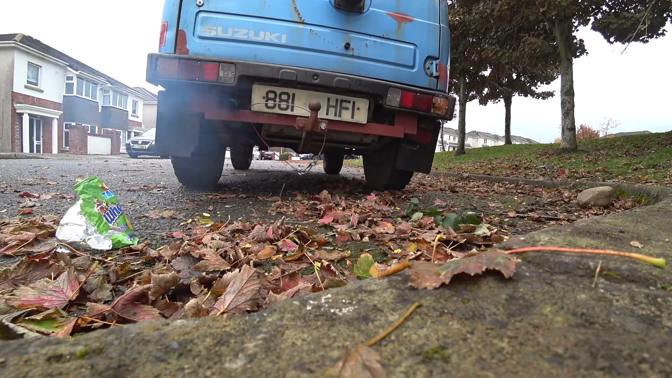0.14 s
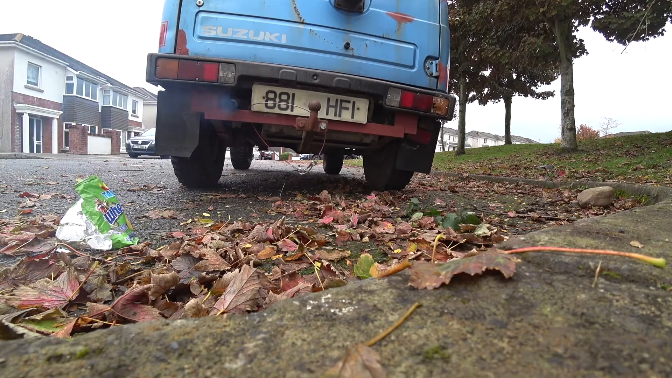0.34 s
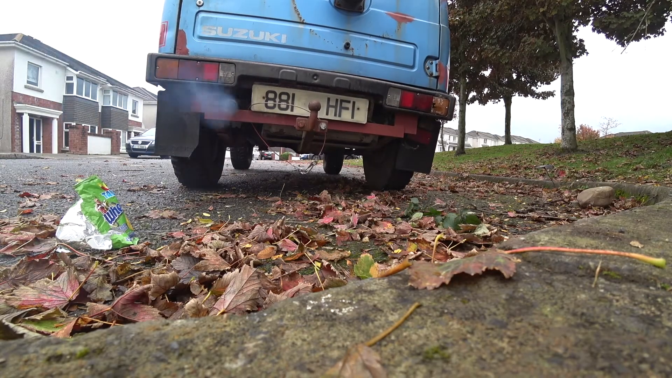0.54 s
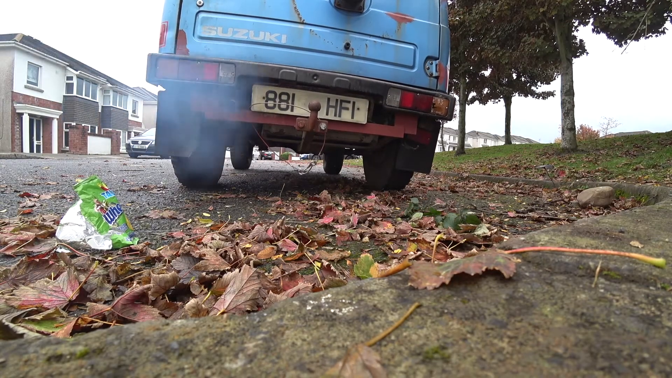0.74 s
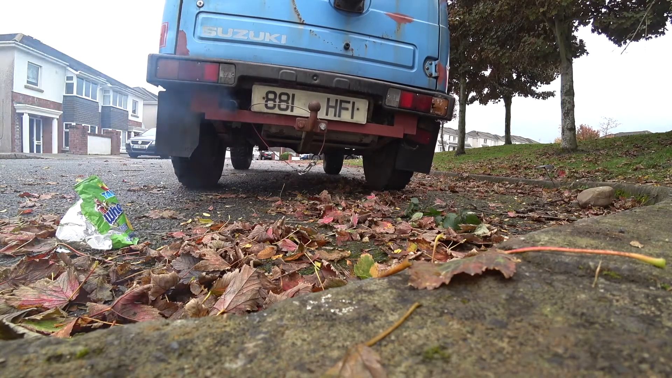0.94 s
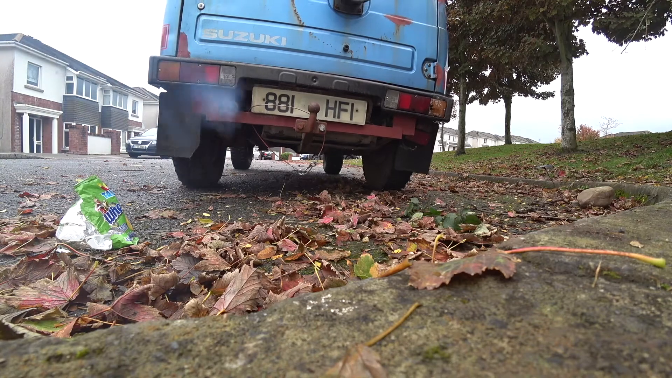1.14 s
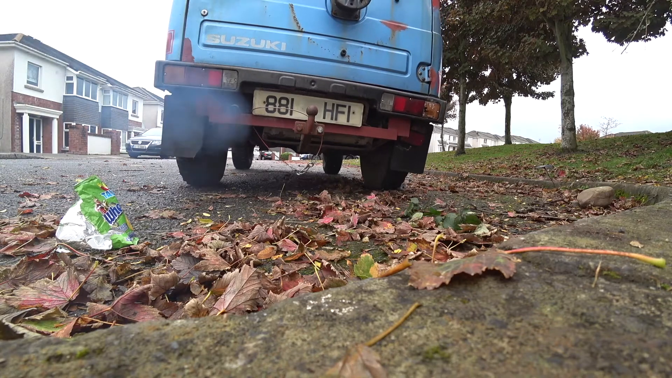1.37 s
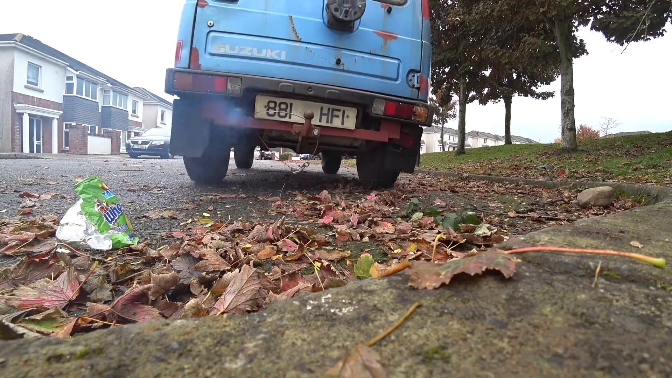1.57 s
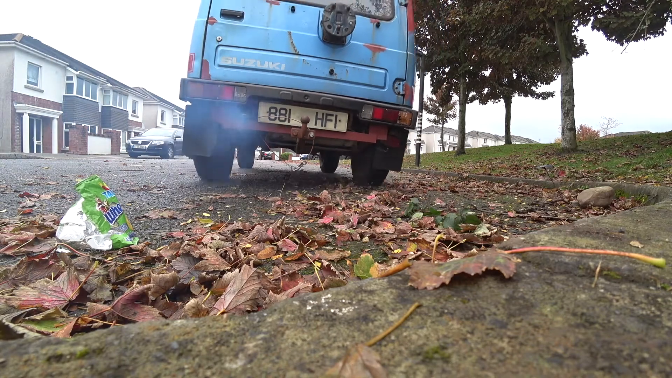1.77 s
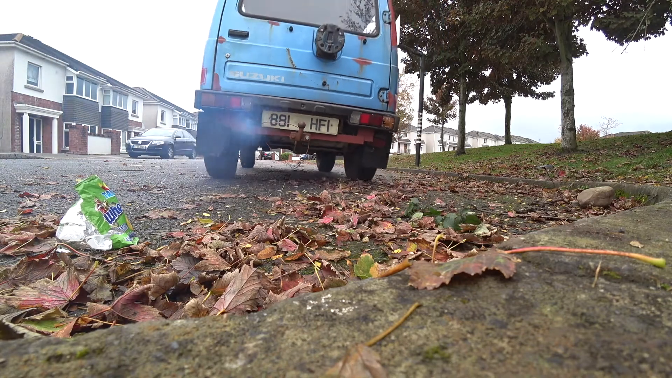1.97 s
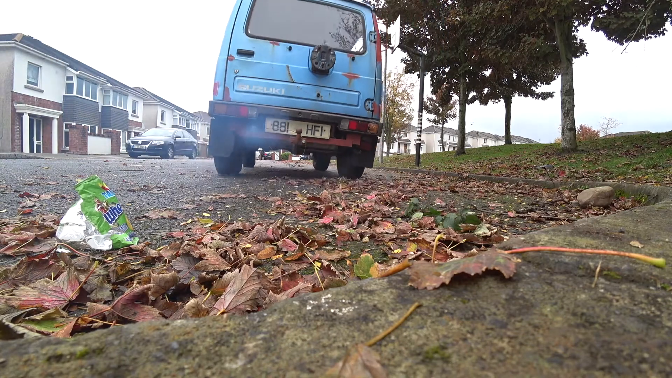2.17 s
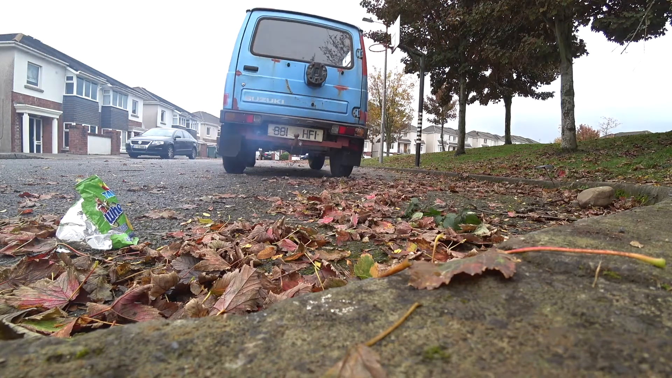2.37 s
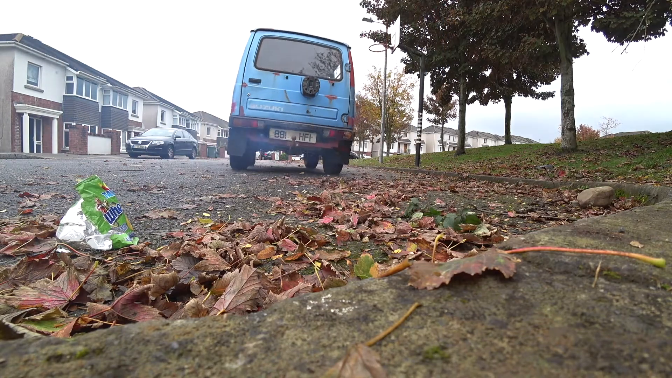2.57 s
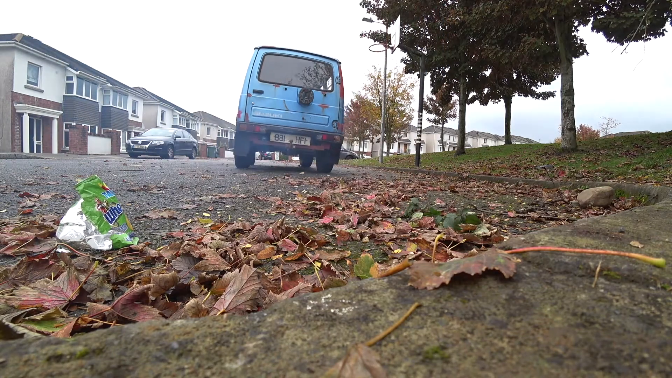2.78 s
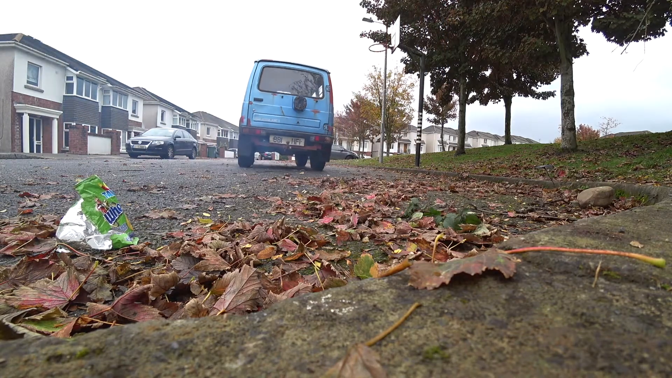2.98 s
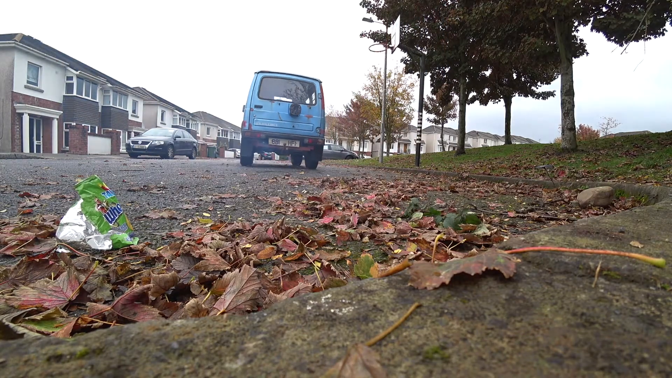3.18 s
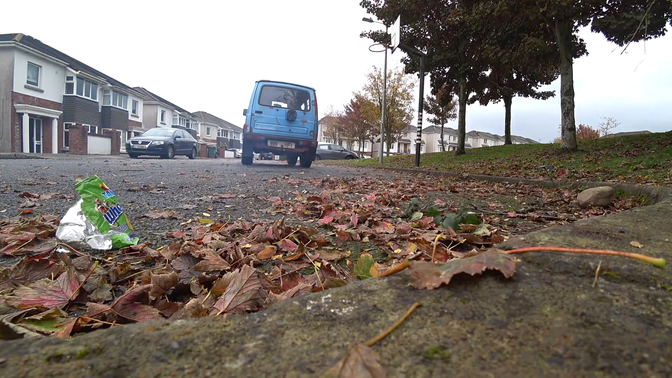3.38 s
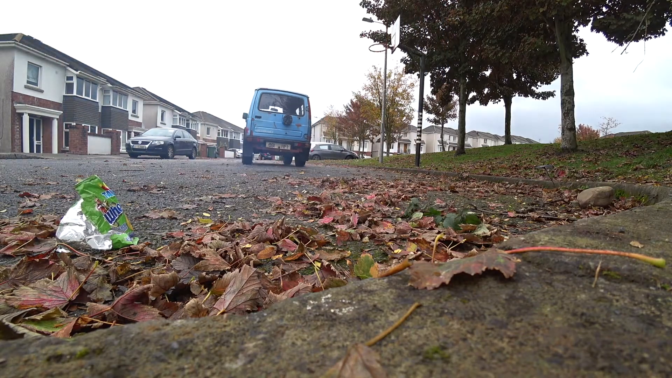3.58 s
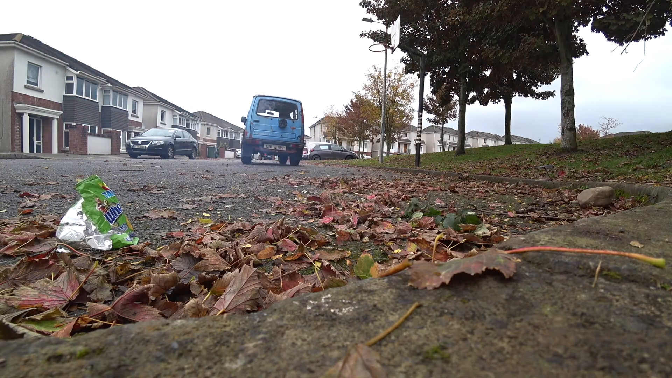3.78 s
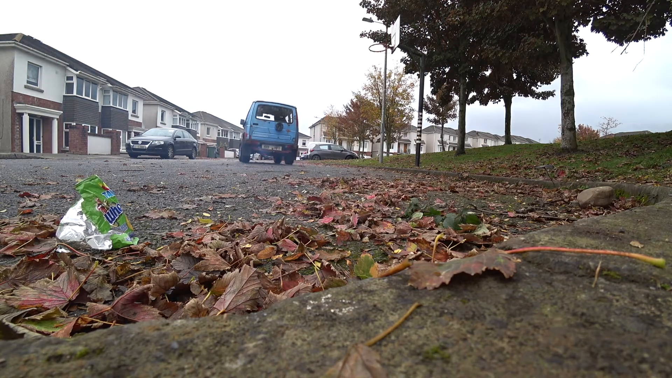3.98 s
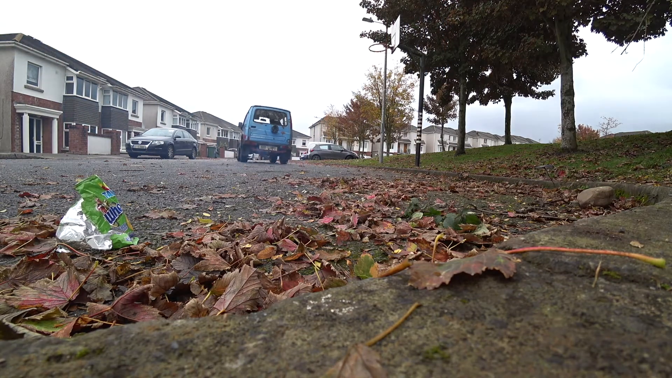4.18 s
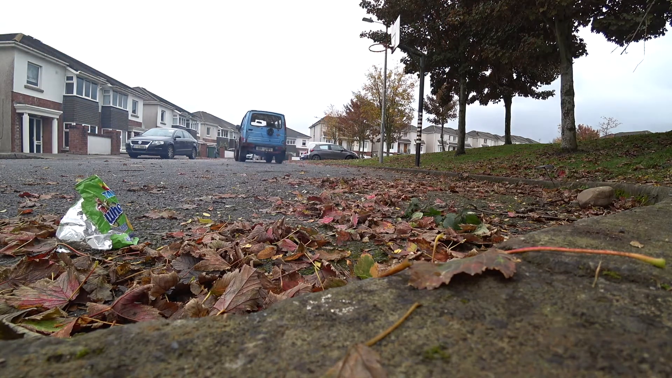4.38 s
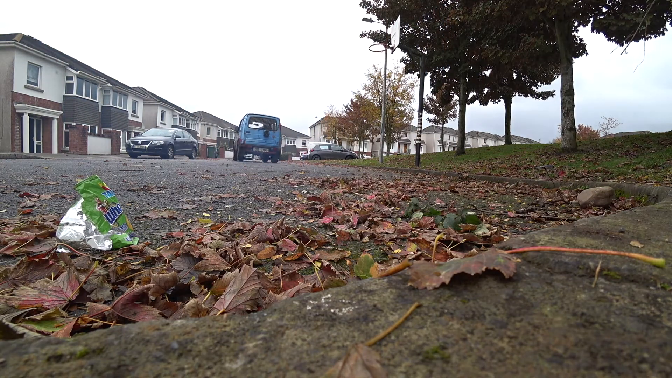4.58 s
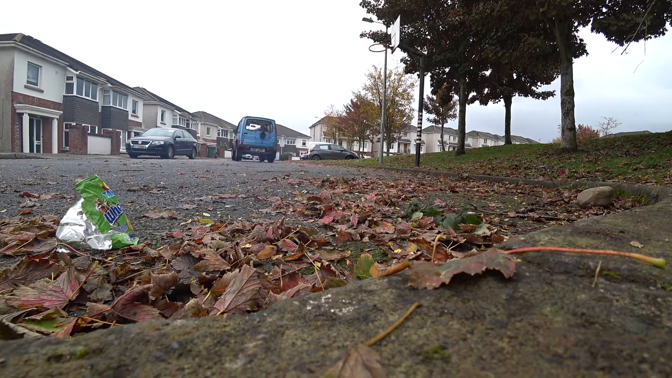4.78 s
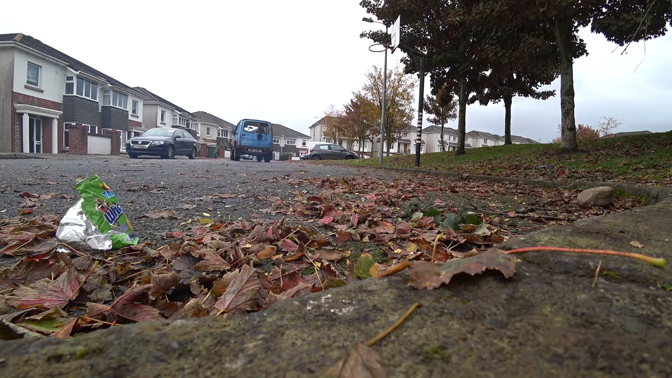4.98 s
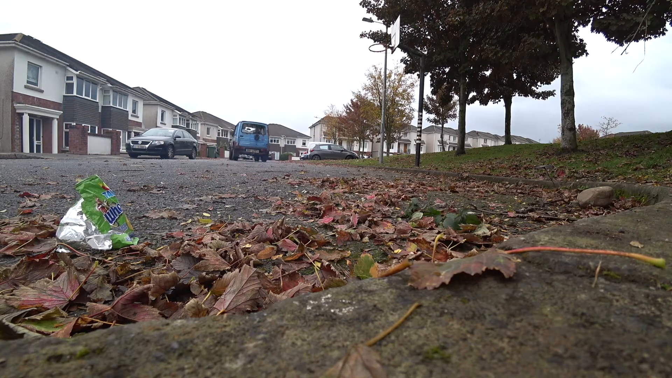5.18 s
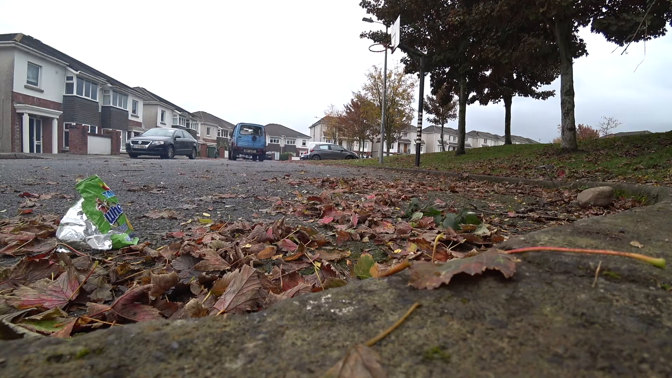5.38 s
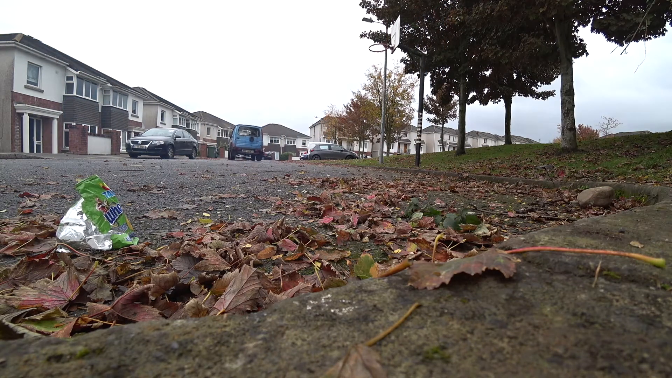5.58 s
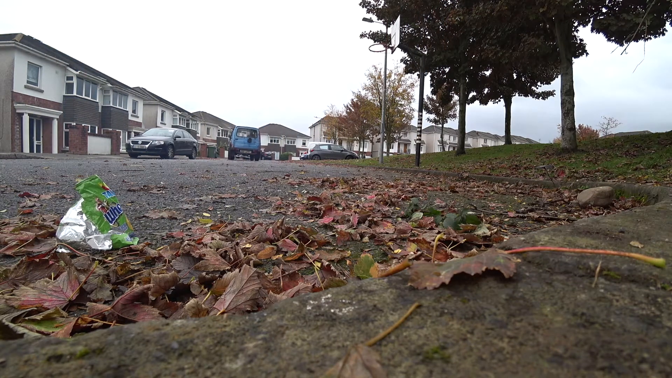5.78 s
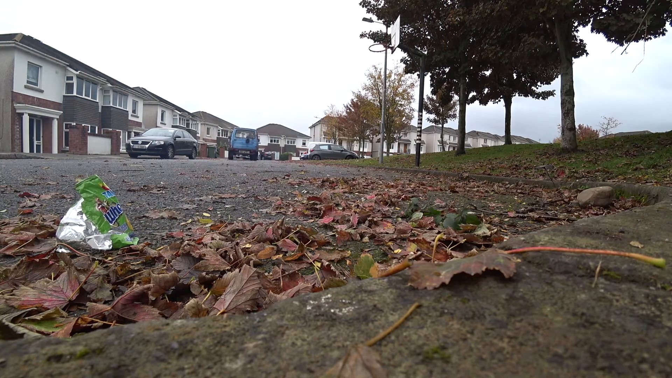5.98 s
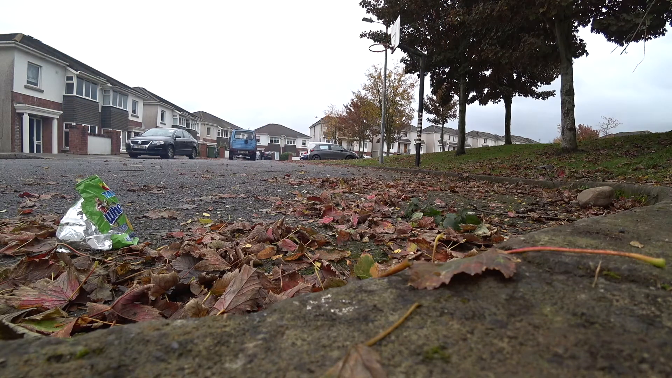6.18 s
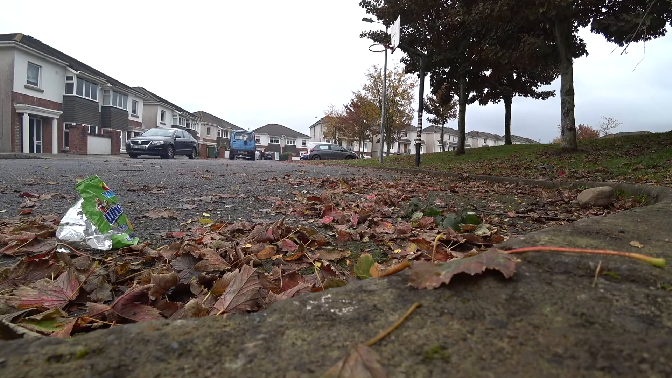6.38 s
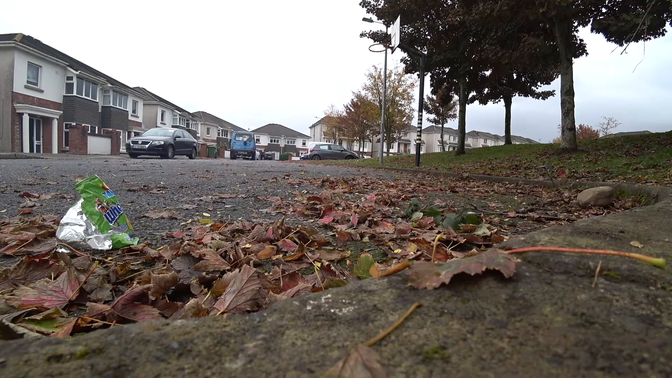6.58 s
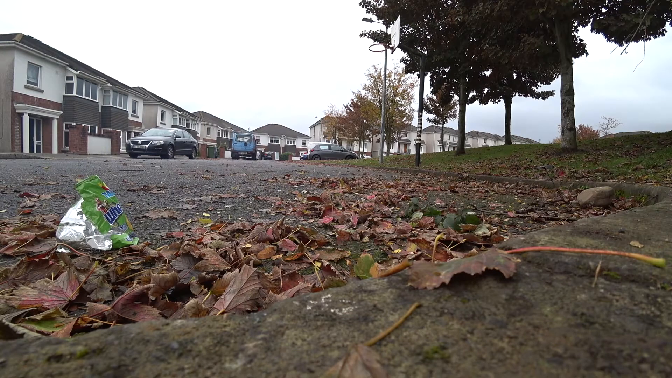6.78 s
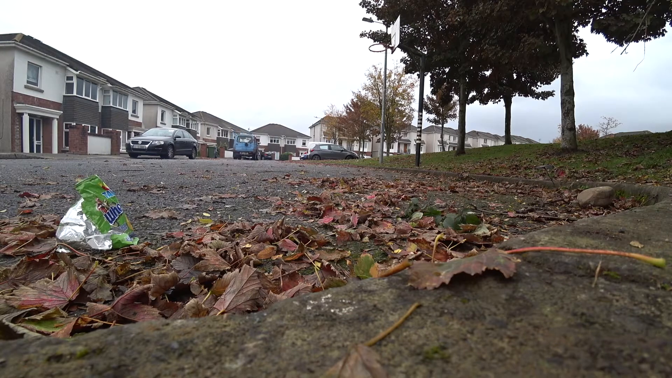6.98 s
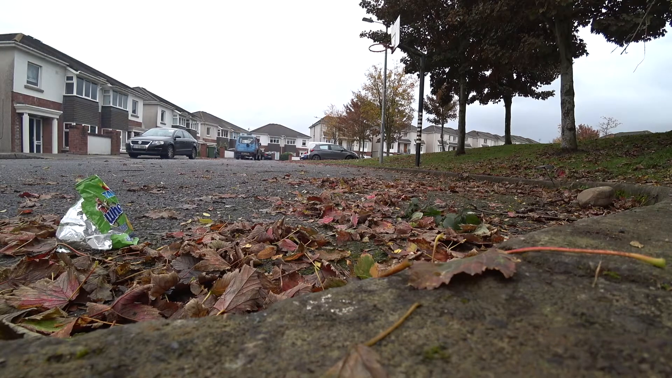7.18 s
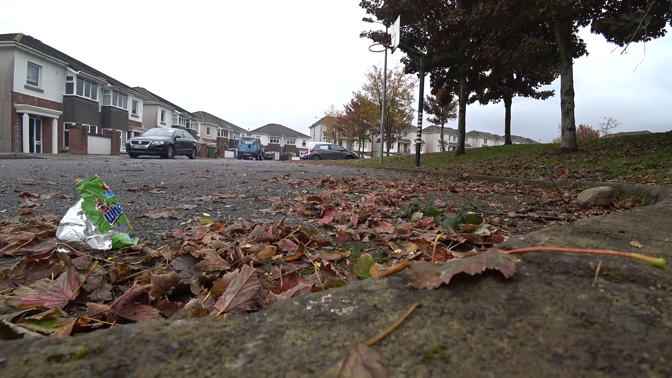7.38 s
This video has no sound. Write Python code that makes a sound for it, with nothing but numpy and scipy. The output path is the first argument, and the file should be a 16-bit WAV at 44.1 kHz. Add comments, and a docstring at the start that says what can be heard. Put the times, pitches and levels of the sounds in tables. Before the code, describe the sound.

A fixed microphone low at the kerb hears a rough little engine revved twice, its tailpipe booming and barking slightly to the left. The car moves off, leaves rustling and snapping under its tyres. The engine sags, pulls harder in first gear, eases off, then takes up a softer, lower hum in the distance. Faint bassy street noise and short house echoes surround it.

```python
"""A small old four-cylinder 4x4 blips its throttle twice, pulls away from the kerb and changes up once.
The tailpipe booms in low multiples of the firing rate, barks in higher ones and rasps in puffs of noise.
A loose exhaust shield buzzes under load, the block hums, and the valve gear ticks and hisses in pulsed noise.
Noise bursts crack dry leaves and grit under the tyres, leaves rustle, house fronts echo the exhaust,
and a faint steady noise is the street."""
import sys
import numpy as np
from scipy import signal
from scipy.fft import rfft, irfft, next_fast_len
from scipy.io import wavfile

SR = 44100
rng = np.random.default_rng(int(sys.argv[2]) if len(sys.argv) > 2 else 0)


def to_wav(sig):
    """Store sig (one row per channel, or 1-D mono) as 16-bit WAV at the path in sys.argv[1].

    Samples outside -1..1 are clipped; the rate is SR.
    """
    pcm = np.clip(np.atleast_2d(sig), -1, 1) * 32767
    pcm = np.round(pcm).astype(np.int16)
    wavfile.write(sys.argv[1], SR, pcm.T)  # frames by channels


N = 328104

# colour of the street: pitch_hz, relative level_db
STREET_COLOUR = [(20, -8), (45, -1), (70, 6.5), (120, -5.5), (155, 5.5), (200, -5), (290, -5), (400, -11),
                 (900, -36), (2000, -34.5)]
# how alike left and right are in the noises: pitch_hz, likeness 0-1
LIKENESS = [(60, 1), (180, 1), (350, 0.9), (700, 0.89), (1300, 0.57), (2000, 0.75), (2800, 0.59),
            (3600, 0.76), (7000, 0.8), (10000, 0.73)]
# how far the sound leans to the left: start_s, lean (1 = the port tables as they stand)
LEAN = [(0, 1.1), (1.8, 0.97), (2.3, 0.6), (3.2, 0.25), (3.6, 1.26), (4.4, 0.48), (5.6, 0.19), (7.44, 0.24)]
# left ahead of right at a lean of 1: pitch_hz, lead_radians
PORT_PHASE = [(40, 0.28), (90, 0.67), (150, 0.94), (300, 1.24), (900, 0.78), (1500, 0.25), (2300, 0.46),
              (3200, 0.09), (10000, 0.096)]
# left louder than right at a lean of 1: pitch_hz, difference_db
PORT_BALANCE = [(60, 1), (110, 1), (190, 2.5), (340, 3), (620, 0.5), (1100, 4), (1970, 2), (3530, 1),
                (6320, 0.5), (11300, 0)]
CUTOFF_HZ = 11100

# leaves and grit cracking under the tyres: start_s, relative peak level_db, pitch_hz
CRACKS = [(2.053, -24, 6500), (2.114, -28, 2013), (2.12, -22.5, 4500), (2.182, -23, 4330),
          (2.231, -25, 4100), (2.27, -25, 2130), (2.297, -23.5, 4540), (2.33, -27, 7460),
          (2.458, -31, 2310), (2.477, -23, 1920), (2.483, -27, 2900), (2.484, -27, 8000),
          (2.586, -30, 7100), (2.654, -27, 4230)]
# dry leaves rustling under the tyres and in the car's wake: start_s, level_db before flutter
RUSTLE_LEVEL = [(0, -75), (1.9, -53), (2.35, -44), (2.6, -48), (2.9, -56.5), (4.0, -53), (4.4, -78),
                (7.44, -91)]
# colour of the rustle: pitch_hz, relative level_db
RUSTLE_COLOUR = [(2000, -15), (7000, -5), (9000, -3), (11000, -2)]

# stabs of the pedal while standing: pressed_s, released_s, gain in firings_per_s
BLIPS = [(0.0, 0.108, 14), (.625, .755, 15)]
BLIP_ATTACK_S, BLIP_RELEASE_S, SPIN_DOWN_S = 0.029, 0.11, 0.025
# as the pedal snaps up after a blip, the boom swells once, deeper
SWELL_DELAY_S, SWELL_WIDTH_S = 0.048, 0.075
# engine speed without the blips: start_s, rate in firings_per_s
SPEED = [(0.0, 72.5), (0.22, 79.0), (0.45, 73.9), (0.6, 70.6), (0.85, 81.4), (0.96, 75.8), (1.08, 79.2),
         (1.27, 74.0), (1.58, 78.4), (1.79, 75.6), (2.05, 63.8), (2.32, 60.0), (2.54, 58.8), (2.77, 55.4),
         (3.06, 61.5), (3.35, 64.0), (3.58, 74.4), (3.9, 79.6), (4.11, 85.5), (4.18, 86.5), (4.26, 80.3),
         (4.56, 76.1), (5.13, 65.2), (5.44, 44.4), (5.85, 51.0), (6.34, 54.0), (6.89, 54.0), (7.44, 59.6)]
# throttle without the blips; the pedal takes up the clutch, eases, pulls in first gear,
# lifts for the change and pulls gently in second: start_s, throttle 0-1
THROTTLE = [(0, 0.81), (.5, 0.79), (.95, 0.79), (1.5, 0.96), (1.9, 0.75), (2.5, 0.68), (2.75, 0.45),
            (3.25, 0.59), (3.5, 0.9), (4.04, 0.83), (4.22, 0.44), (4.8, .25), (5.52, 0.06), (5.75, 0.38),
            (7.05, .39), (7.44, 0.62)]
# the car draws away: start_s, share of the distant colour 0-1
FAR = [(0, .1), (1.7, 0.062), (2.48, 0.48), (2.8, 0.83), (4.2, 1), (6.9, 0.8), (7.44, 0.6)]
# sharply pulsed on an open throttle, only a rush on the overrun: start_s, pulsed share of the exhaust 0-1
PULSED = [(0, .48), (1.2, .52), (1.42, .85), (1.8, .8), (2.0, .42), (3.3, .5), (3.5, .85), (4.08, .85),
          (4.2, .12), (5.6, .12), (5.9, .66), (7.44, .62)]

# the engine block, in the open once the car has moved off: start_s, level_db
BLOCK_LEVEL = [(0, -51), (1.6, -53), (1.9, -40.5), (2.5, -40), (3.2, -48.5), (4.2, -55), (5.5, -58.5),
               (6.2, -45), (7.44, -74)]
# modes of the block: pitch_hz, relative level_db, ring_s to fall 60 dB
BLOCK_MODES = [(653, -16.5, 0.076), (861, -5.5, 0.041), (1236, -2.5, 0.035)]
# modes of the loose exhaust shield: pitch_hz, relative level_db, ring_s to fall 60 dB
SHIELD_MODES = [(1900, -12, .012), (2123, -3, 0.025), (2287, 0, 0.015), (2520, -30, 0.021),
                (3400, -1.5, 0.0052), (4260, -4.5, 0.023)]
# colours of the valve gear, near and far: pitch_hz, relative level_db
CLATTER_NEAR = [(620, -5), (1050, -2), (1140, -0.5), (1400, -6), (1650, -3.5), (1930, -6), (2060, -5.5),
                (2220, -8), (2730, -10), (3250, -4.5), (3780, -6), (4170, -4), (5170, -11.5), (5500, -16),
                (7150, -31), (12100, -120)]
CLATTER_FAR = [(620, -36), (1050, -4), (1240, -7.5), (1390, -4.5), (2220, -11), (2770, -16.5),
               (4110, -11.5), (5500, -24), (7150, -22), (12100, -120)]
HISS_NEAR = [(3120, -14), (5300, -3), (6250, 3.5), (7420, 3), (8560, -6), (10200, -3.5), (11000, -9.5),
             (14300, -41), (22000, -120)]
HISS_FAR = [(3120, -2.5), (5300, -1.5), (7080, -1.5), (8610, -9.5), (10500, -11.5), (11000, -16.5),
            (14300, -42), (22000, -120)]

# underbody panels: pitch_hz, width_hz, relative level_db
PANELS = [(436, 8.6, -0.5), (605, 16, -1.5), (695, 29, -5.5), (880, 66, -1), (1154, 40, 2)]
# colour of the rushing gas: pitch_hz, relative level_db
RASP_COLOUR = [(25, -40), (60, 1), (115, -2.5), (160, 10), (215, -5), (285, 3.5), (350, 0), (450, -2.5),
               (600, -4.5), (760, -5.5), (880, -9.5), (1050, -10), (1300, -21), (1800, -43)]
# response of the pipe to the higher multiples: pitch_hz, relative level_db
PIPE = [(300, -20), (365, 2.5), (450, 3.5), (530, 7), (620, 1.5), (780, 0.5), (900, -5), (1050, -10.5),
        (1250, -8), (1600, -20.5), (2200, -13)]
# exhaust resonances through which the boom's partials glide: pitch_hz, relative level_db
SILENCER = [(45, -52), (53, -50), (60, -24), (72, -17.5), (80, -17), (92, -20), (112, -21), (135, -25),
            (148, -17.5), (160, -15.5), (175, -18.5), (195, -23.5), (220, -38.5), (240, -29), (270, -22),
            (298, -29), (318, -47.5), (340, -34.5), (365, -33), (410, -35.5), (445, -36)]
# the first five multiples of the firing rate: relative level_db at full throttle,
# drop_db with the throttle shut, change_db far away, change_db in the swell
PARTIALS = [(1.14, 3.5, 0.6, 5), (0, 11, -2.5, -3), (-3, 13, 1.35, -3.5), (3, 23.5, -5.5, -7),
            (0, 33, 4.5, 3)]
# overall course of the boom: start_s, relative level_db
BOOM_LEVEL = [(0, 0), (.55, -1.6), (1.1, -0.5), (1.8, 1), (2.45, 1), (2.6, 2), (2.78, 6.5), (2.97, -2),
              (3.35, -1.3), (3.5, 0), (4.02, 2), (4.15, -4), (5.07, -5), (5.16, -9), (5.35, -7),
              (5.58, -0.5), (5.85, 4.5), (6.8, 2.5), (7.44, -1.8)]

# levels at full throttle, drops with the throttle shut, and losses far away (dB)
BARK_DB, RASP_DB, EXHAUST_DROP_DB = -31.04, -23, 17.5
CLATTER_DB, CLATTER_DROP_DB = -36, 14
HISS_DB, HISS_DROP_DB, HISS_FAR_LOSS_DB = -38, 11.5, 4.5
# the steep drop lets the shield buzz only when the engine pulls hard
BUZZ_DB, BUZZ_DROP_DB, BUZZ_FAR_LOSS_DB = -24.5, 79, 5


def from_db(db):
    """Decibels to gain."""
    return 10 ** (np.asarray(db) / 20)


def rms_one(x):
    """Scale to rms 1."""
    return x / np.sqrt(np.mean(x ** 2) + 1e-20)


def in_time(curve):
    """Read a two-column curve at every sample."""
    s, value = np.transpose(curve)
    return np.interp(np.arange(N) / SR, s, value)


def at_hz(points, hz):
    """Read a spectrum on a log-frequency axis."""
    f, value = np.transpose(points)
    return np.interp(np.log(hz + 1e-3), np.log(f + 1e-3), value)


def filtered(x, response):
    """Apply a response, given as a function of Hz."""
    size = next_fast_len(N + 8192)
    hz = np.arange(size // 2 + 1) * SR / size
    return irfft(rfft(x, size) * response(hz), size)[..., :N]


def bandpassed(x, order, low_hz, high_hz):
    """Keep a band of pitches."""
    sos = signal.butter(order, [low_hz, high_hz], "band", fs=SR, output="sos")
    return signal.sosfilt(sos, x)


def drift(rate_hz):
    """Slow random wander of spread 1, made at a fortieth of the sample rate."""
    r = np.exp(-80 * np.pi * rate_hz / SR)
    slow = signal.lfilter([1], [1, -2 * r, r * r], rng.standard_normal(N // 40 + 2002))
    slow = rms_one(slow[2000:])  # past the settling
    return np.interp(np.arange(N) / 40, np.arange(len(slow)), slow)


def noise(spectrum):
    """Stereo noise of a given colour, falling steeply above its last point; its two sides differ by pitch."""
    def colour(hz):
        return from_db(at_hz(spectrum, hz)) / np.maximum(hz / spectrum[-1][0], 1) ** 2

    def alike(hz):
        return np.clip(at_hz(LIKENESS, hz), 0, 1)

    mid = filtered(rng.standard_normal(N), lambda hz: colour(hz) * np.sqrt(1 + alike(hz)))
    side = filtered(rng.standard_normal(N), lambda hz: colour(hz) * np.sqrt(1 - alike(hz)))
    return np.array([mid + side, mid - side]) / mid.std()


def receding_noise(near_colour, far_colour, far):
    """Crossfade from the near colour to the distant one at equal power."""
    return np.sqrt(1 - far) * noise(near_colour) + np.sqrt(far) * noise(far_colour)


def ring(clicks, hz, t60):
    """A unit click sets a decaying sine ringing, of height 1 before decay."""
    r, w = from_db(-60 / (t60 * SR)), 2 * np.pi * hz / SR
    return signal.lfilter([0, np.sin(w)], [1, -2 * r * np.cos(w), r * r], clicks + 1e-18)


def puffs(turns, decay, steady, scatter_db):
    """An envelope of rms 1 that jumps to a new height once a turn and dies away over a share of the turn."""
    height = from_db(scatter_db * rng.standard_normal(4096).clip(-2, 2))
    return rms_one(steady + height[turns.astype(int)] * np.exp(-(turns % 1) / decay))


def street():
    """A faint steady noise, strongest in the bass."""
    return from_db(-35) * noise(STREET_COLOUR)


def house_fronts(x):
    """Six dull echoes a side, each at its own delay."""
    x = bandpassed(x, 1, 250, 2500)
    lags = (rng.uniform(.02, .16, (2, 6)) * SR).astype(int)
    return from_db(-8) * np.array([sum(np.pad(x, (lag, 0))[:N] for lag in side) for side in lags])


def microphone_ports(x):
    """Sound from the left reaches the left port earlier and a little louder."""
    def lead(hz):
        return 1j * np.tan(at_hz(PORT_PHASE, hz) / 2) + np.tanh(at_hz(PORT_BALANCE, hz) * np.log(10) / 40)

    side = in_time(LEAN) * filtered(x.mean(axis=0), lead)
    return x + np.array([side, -side])


def rustle():
    """Leaves brush together as fluttering, treble-heavy noise."""
    return from_db(in_time(RUSTLE_LEVEL) + 2.5 * drift(40)) * noise(RUSTLE_COLOUR)


def cracks():
    """Each leaf or bit of grit snaps as a short noise burst around its own pitch."""
    out, t = np.zeros((2, N)), np.arange(SR // 20) / SR
    for s, db, hz in CRACKS:
        burst = rng.standard_normal(len(t)) + 0.27 * rng.standard_normal((2, len(t)))
        burst = burst * np.exp(-t / 0.003)
        burst = bandpassed(burst, 2, hz / 1.24, min(hz * 1.13, SR / 2.2))
        start = int(s * SR)
        out[:, start:start + len(t)] += from_db(db - 1.5) * burst / abs(burst).max()
    return out


def driver():
    """A blip opens the throttle and the engine races, then spins down; gives firing rate, shut 0-1 and swell."""
    t = np.arange(N) / SR
    firing_hz, shut, swell = in_time(SPEED), 1 - in_time(THROTTLE), 0
    for pressed, released, gain_hz in BLIPS:
        # the pedal is down at "pressed" and fully up at "released"
        pedal = np.clip(np.minimum(1 + (t - pressed) / BLIP_ATTACK_S, (released - t) / BLIP_RELEASE_S), 0, 1)
        spin_up = np.clip((t - pressed) / (released - pressed), 0, 1)
        spin_down = np.exp(-np.maximum(t - released, 0) / SPIN_DOWN_S)
        shut = shut * (1 - pedal) ** 2
        firing_hz = firing_hz + gain_hz * spin_up * spin_down
        swell = swell + np.exp(-((t - released - SWELL_DELAY_S) / SWELL_WIDTH_S) ** 2)
    return firing_hz, shut, swell


def block(firings):
    """Combustion knocks the engine block, which hums in a few modes."""
    knocks = rng.standard_normal(N) * puffs(firings, decay=1.0, steady=0.36, scatter_db=-1.5)
    hum = sum(from_db(db) * ring(knocks, hz, t60) for hz, db, t60 in BLOCK_MODES)
    return from_db(in_time(BLOCK_LEVEL)) * rms_one(hum)


def valve_hiss(firings, shut, far):
    """The valves close between firings, each time with a puff of treble noise."""
    level_db = HISS_DB - HISS_DROP_DB * shut - HISS_FAR_LOSS_DB * far
    closing = puffs(firings + 0.26, decay=0.43, steady=2.5, scatter_db=6.5)
    return from_db(level_db) * receding_noise(HISS_NEAR, HISS_FAR, far) * closing


def valve_clatter(firings, shut, far):
    """The valve gear ticks as noise that jumps at every firing."""
    ticks = puffs(firings, decay=0.35, steady=1.95, scatter_db=5.5)
    clatter = receding_noise(CLATTER_NEAR, CLATTER_FAR, far)
    return from_db(CLATTER_DB - CLATTER_DROP_DB * shut) * clatter * ticks


def shield(firings, shut, far):
    """The loose sheet is knocked hard once per crank turn, softer by the firing between, and chatters each time."""
    chatter_s = 0.0035
    buzz_db = BUZZ_DB - BUZZ_DROP_DB * shut - BUZZ_FAR_LOSS_DB * far
    count = (firings + .7).astype(int)
    knock_db = buzz_db - 2.0 * (count % 2) + rng.standard_normal(N)
    knocks = np.diff(count, prepend=0) * from_db(knock_db)
    contact = signal.lfilter([1], [1, -np.exp(-1 / (chatter_s * SR))], knocks + 1e-18) / np.sqrt(chatter_s * SR)
    chatter = contact * (rng.standard_normal(N) + 0.49 * rng.standard_normal((2, N)))
    push = 0.46 * knocks + chatter
    return sum(from_db(db) * ring(push, hz, t60) for hz, db, t60 in SHIELD_MODES)


def body(x):
    """Panels ring at their own fixed pitches, lifting whatever glides through them."""
    def peaks(hz):
        return 1 + sum(from_db(db) / (1 + 2j * (hz - centre) / width) for centre, width, db in PANELS)

    return rms_one(filtered(x, peaks))


def rasp(firings, shut, pulsed):
    """Gas rushes out as noise, swelling in a puff at every firing."""
    rush = from_db(RASP_DB - EXHAUST_DROP_DB * shut) * np.sqrt(1 - pulsed) * body(noise(RASP_COLOUR))
    return rush * puffs(firings, decay=.55, steady=1.35, scatter_db=3)


def bark(firings, firing_hz, shut, pulsed):
    """Higher multiples glide through the pipe's response, fluttering as the gas flow breaks up."""
    angle = 2 * np.pi * (firings + .002 * drift(25))
    tone = 0
    for k in range(6, 23):
        level = from_db(at_hz(PIPE, k * firing_hz) + 2 * drift(6))
        smear = .3 * k * k + rng.normal(0, .8)  # phase in radians
        tone = tone + level * np.cos(k * angle + smear)
    return from_db(BARK_DB - EXHAUST_DROP_DB * shut) * np.sqrt(pulsed) * body(tone)


def partial_levels(firing_hz, shut, far, swell):
    """Each partial is loud where it meets an exhaust resonance; the upper ones need an open throttle."""
    course_db = in_time(BOOM_LEVEL)
    levels = []
    for k, (db, drop_db, far_db, swell_db) in enumerate(PARTIALS):
        resonance_db = at_hz(SILENCER, (k + 1) * firing_hz)
        levels.append(course_db + resonance_db + db - drop_db * shut + far_db * far + swell_db * swell)
    return levels


def boom(firings, firing_hz, shut, far, swell, pulsed):
    """Low multiples of the firing rate, spread by the pipe; unequal cylinders add faint lines between them."""
    closed = np.clip((.82 - pulsed) / .33, 0, 1)
    # the pulse changes shape with firing rate and as the throttle closes (phase in radians)
    lag = .6 + .1 * (firing_hz - 77) - 2.3 * closed
    waver_db = 0.98 + 1.1 * closed * (1 - far)
    angle = 2 * np.pi * firings
    tone = 0
    for k, db in enumerate(partial_levels(firing_hz, shut, far, swell)):
        phase = k * lag + 1.022 * k * (k - 1)  # the second term is the pipe's dispersion
        tone = tone - from_db(db + waver_db * drift(13.3)) * np.cos((k + 1) * angle + phase)
    # lightly loaded, the engine fires less evenly
    cylinders = sum((1 + .7 * drift(4)) * np.cos(angle * k / 4 + k) for k in range(1, 3))
    return np.sqrt(2) * tone * (1 + from_db(-32.5 + 5.4 * closed) * cylinders)


def scene():
    """The engine sounds are timed by the count of firings; throttle and distance shape them."""
    firing_hz, shut, swell = driver()
    firings = np.cumsum(firing_hz) / SR
    pulsed = in_time(PULSED)
    far = in_time(FAR).clip(0, 1)
    low = boom(firings, firing_hz, shut, far, swell, pulsed)
    high = bark(firings, firing_hz, shut, pulsed)
    exhaust = low + high + rasp(firings, shut, pulsed) + shield(firings, shut, far)
    valve_gear = valve_clatter(firings, shut, far) + valve_hiss(firings, shut, far)
    engine = exhaust + block(firings) + valve_gear
    ground = rustle() + cracks()
    echoes = house_fronts(high + from_db(-29) * low)
    return microphone_ports(engine + ground) + echoes + street()


def record(dry):
    """The top is cut steeply, within 80 Hz either side of the cutoff."""
    return filtered(dry, lambda hz: np.clip((CUTOFF_HZ + 80 - hz) / 160, 0, 1))


dry = scene()
out = record(dry)
to_wav(out)
```